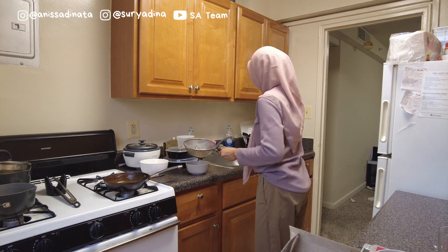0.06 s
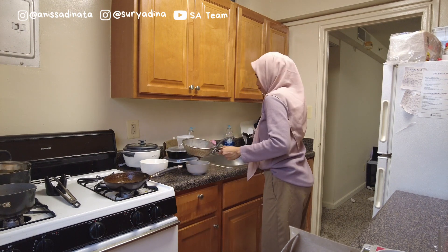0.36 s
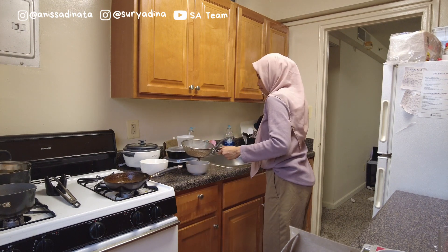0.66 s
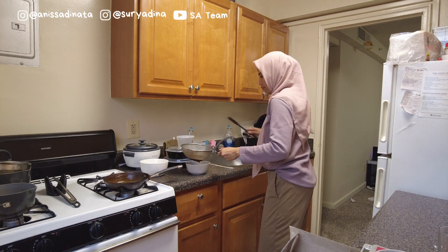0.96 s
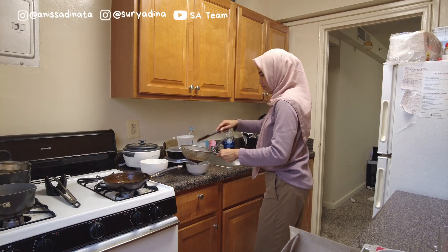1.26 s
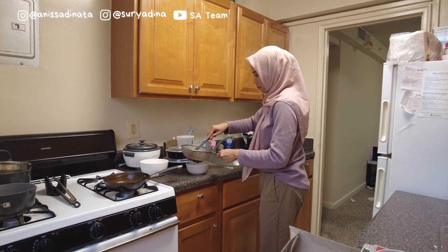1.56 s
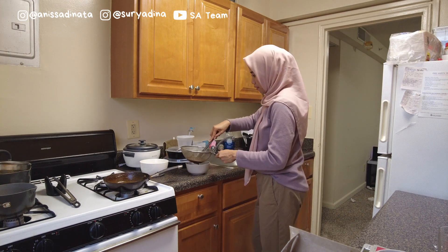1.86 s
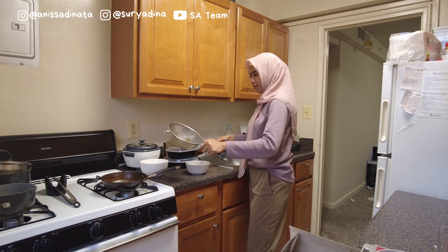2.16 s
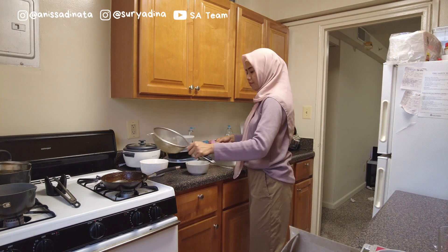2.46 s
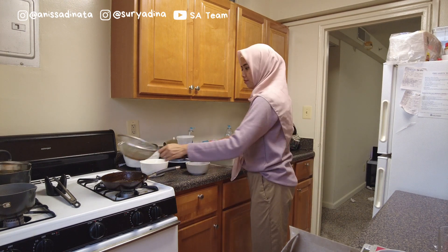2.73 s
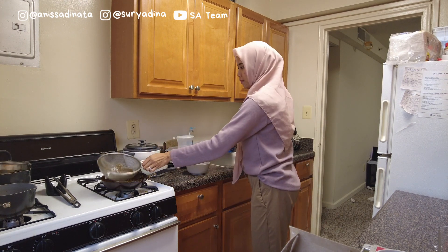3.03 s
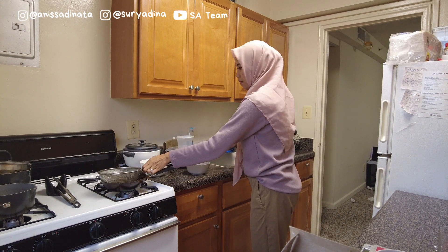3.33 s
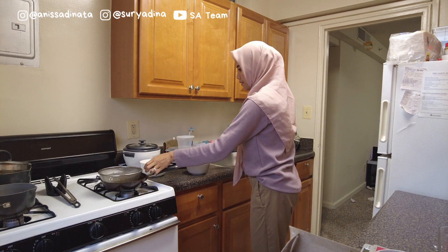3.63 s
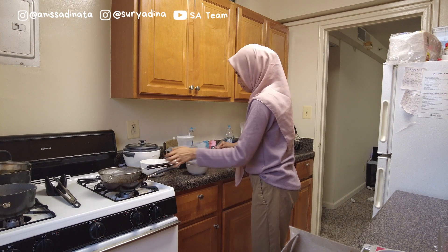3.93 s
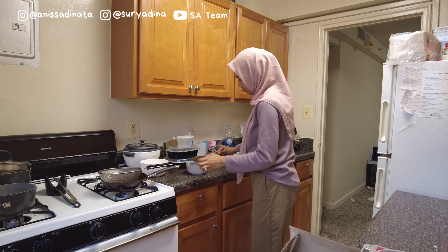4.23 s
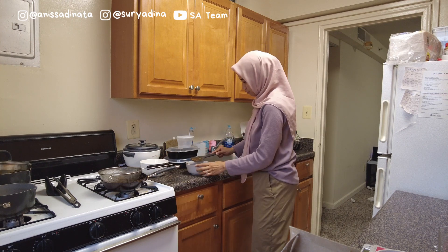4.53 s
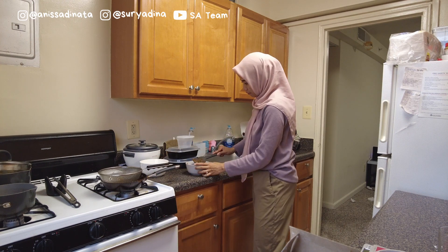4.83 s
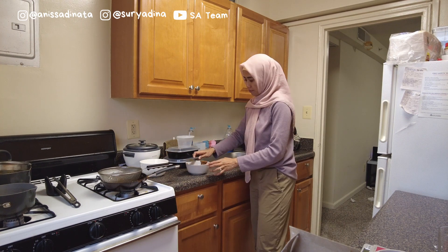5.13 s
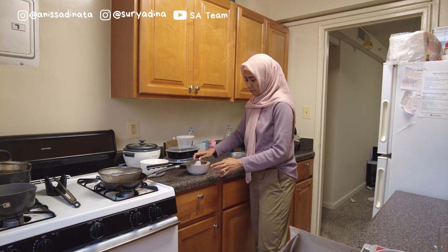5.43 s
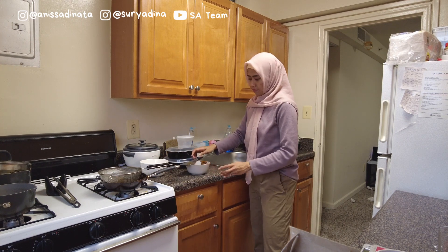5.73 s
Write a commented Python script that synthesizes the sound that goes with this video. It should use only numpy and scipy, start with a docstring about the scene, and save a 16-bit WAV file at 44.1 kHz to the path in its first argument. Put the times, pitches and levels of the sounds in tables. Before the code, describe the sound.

Steady ventilation and a low electrical hum fill a small kitchen throughout, with the action a few steps from the microphone. At about 0.5 seconds a heel knocks dully on the floor, followed by a brief shoe scuff. From 0.9 to 2.3 seconds a spatula wipes a wire sieve in faint, bright hisses, tapping its frame lightly at about 1.1 and 1.8 seconds. At 2.1 seconds the background changes abruptly as a running refrigerator adds a fuller drone. At 3.2 seconds the sieve clatters into a frying pan, with a short metallic clank, a low thud from the stove top and a brief skid as it settles. From 4.2 to 5 seconds the spatula rubs quietly around a bowl, with a thin ringing edge. A soft, dull rush swells twice between 5 and 5.6 seconds, then eases. Tiny ticks are scattered throughout.

```python
"""Sieving syrup in a small kitchen

A heel knocks on the floor a few steps away and a spatula wipes syrup through a wire sieve. The sieve
clatters into a frying pan on the stove, then the spatula rubs round the bowl. Ventilation and mains
hum run throughout; after an abrupt cut at about 2 s, a refrigerator is heard running.
A soft, dull rush swells near the end."""
import sys
import numpy as np
from scipy import signal
from scipy.fft import rfft, irfft
from scipy.io import wavfile

SR = 44100
rng = np.random.default_rng(int(sys.argv[2]) if len(sys.argv) > 2 else 0)


def output_pcm(signal):
    """Save a mono or channel-first signal as 16-bit PCM at the path in sys.argv[1].

    Samples are clipped to [-1, 1] before scaling.
    """
    pcm = np.clip(np.atleast_2d(signal).T, -1, 1) * 32767
    wavfile.write(sys.argv[1], SR, np.round(pcm).astype(np.int16))


N = 254982
TIME = np.arange(N) / SR
FREQS = np.maximum(np.fft.rfftfreq(N, 1 / SR), 1)
MAINS_HZ = 60
SLIDE_ATTACK_S, SLIDE_RELEASE_S = 0.0069, 0.014


def from_db(db):
    """Decibels to gain."""
    return 10 ** (np.asarray(db) / 20)


def unit_rms(x):
    """Scale to unit power."""
    return x / np.sqrt(np.mean(x ** 2) + 1e-20)


def at_hz(points, hz):
    """Interpolate a table over log frequency."""
    f, value = np.transpose(points)
    return np.interp(np.log(hz), np.log(f), value)


def colour(x, spectrum):
    """Filter by rows of f/Hz, relative density/dB; unit power."""
    return unit_rms(irfft(rfft(x) * from_db(at_hz(spectrum, FREQS)), N))


def drift(rate_hz):
    """Slow random wander, unit power."""
    return unit_rms(irfft(rfft(rng.standard_normal(N)) / (1 + (FREQS / rate_hz) ** 2), N))


def diffuse_pair(mid, side, hz):
    """Stereo diffuse field: alike in the bass, largely unrelated in the treble."""
    # left-right coherence: f/Hz, correlation
    coherence = [(30, 1), (120, 0.95), (250, 0.72), (450, 0.77), (700, -0.24), (1400, 0.53), (2400, 0.35),
                 (4400, -0.00018), (15000, -0.32)]
    alike = at_hz(coherence, hz)
    return np.sqrt((1 + alike) / 2) * mid + np.sqrt((1 - alike) / 2) * side * [[1], [-1]]


def mono_noise(spectrum):
    """Coloured noise, unit power."""
    return colour(rng.standard_normal(N), spectrum)


def stereo_noise(spectrum):
    """Diffuse coloured noise, unit power."""
    mid, side = rfft(rng.standard_normal((2, N)))
    return colour(irfft(diffuse_pair(mid, side, FREQS), N), spectrum)


def tones(lines, waver_hz):
    """Tones wavering in amplitude and phase; rows of f/Hz, rms level/dB, waver/fraction."""
    out = 0
    for hz, db, waver in lines:
        wobble = 1 + waver * (drift(waver_hz) + 1j * drift(waver_hz))
        tone = wobble * np.exp(2j * np.pi * (hz * TIME + rng.random()))
        out = out + from_db(db) * unit_rms(diffuse_pair(tone.imag, tone.real, hz))
    return out


def clicks(times_s, level_db):
    """One impulse per contact."""
    out = np.zeros(N)
    out[np.round(np.asarray(times_s) * SR).astype(int)] = from_db(level_db)
    return out


def fade(hits, t60_s, rise_s):
    """Envelope: quick rise at each impulse, exponential decay."""
    rise_pole = np.exp(-1 / (rise_s * SR))
    dying = signal.lfilter([1], [1, -from_db(-60 / (t60_s * SR))], hits + 1e-18)
    return signal.lfilter([1 - rise_pole], [1, -rise_pole], dying)


def ring(drive, hz, t60_s):
    """One mode: a unit impulse starts a decaying unit sine."""
    radius, angle = from_db(-60 / (t60_s * SR)), 2 * np.pi * hz / SR
    return signal.lfilter([0, np.sin(angle)], [1, -2 * radius * np.cos(angle), radius ** 2], drive + 1e-18)


def pushes(rows, attack_s, release_s):
    """Envelope: each push rises, holds and decays; the strongest counts."""
    envelopes = []
    for start_s, length_s, db in rows:
        attack = np.clip((TIME - start_s) / attack_s, 0, 1)
        release = np.exp(-np.maximum(TIME - start_s - length_s, 0) / release_s)
        envelopes.append(from_db(db) * attack * release)
    return np.max(envelopes, axis=0)


def rubbing(pressure, spectrum, judder_db):
    """Stick-slip friction: coloured noise of uneven level."""
    return pressure * from_db(judder_db * drift(rate_hz=9.1)) * mono_noise(spectrum)


def struck(times_s, level_db, modes, grit, grit_db, grit_t60_s, detune, scatter_db):
    """Each contact grates briefly and rings the modes with scattered strength and pitch."""
    out = from_db(grit_db) * fade(clicks(times_s, level_db), grit_t60_s, rise_s=0.00063) * mono_noise(grit)
    t = TIME[:SR // 5]
    hz, mode_db, t60_s = np.transpose(modes)[:, :, None]
    for at_s, contact_db in zip(times_s, level_db):
        strength, pitch = rng.standard_normal((2, len(modes), 1))
        polarity = rng.choice([-1, 1], (len(modes), 1))
        dying = from_db(contact_db + mode_db + scatter_db * strength - 60 * t / t60_s)
        partials = polarity * dying * np.sin(2 * np.pi * hz * (1 + detune * pitch) * t)
        start = int(at_s * SR)
        out[start:start + len(t)] += partials.sum(axis=0)
    return out


def ventilation(air_db=-38):
    """Moving air and building rumble under wavering fan tones."""
    # air and rumble: f/Hz, relative density/dB
    air = [(10, -16.5), (19, 2), (32, -13), (55, -15), (90, -25), (125, -21.5), (175, -31.5), (260, -32),
           (370, -41.5), (660, -44), (830, -46), (1600, -50), (2400, -59.5), (2900, -59.5), (3600, -64.5),
           (5800, -67), (11000, -75.5), (15500, -75.5)]
    # fan tones: f/Hz, rms level/dB, waver/fraction
    fan_lines = [(330.5, -67.5, 0.52), (271.4, -71.5, 1.2), (616, -74, 0.58), (681, -75, 1.7)]
    return from_db(air_db) * stereo_noise(air) + tones(fan_lines, waver_hz=2.2)


def mains_hum(fridge_running, level_db=-45.5, load_db=1.55):
    """Hum at twice the mains rate, louder while the refrigerator runs."""
    return from_db(load_db * fridge_running) * tones([(2 * MAINS_HZ, level_db, 0.08)], waver_hz=1.7)


def knocks(swell_t60_cycles=2.7):
    """A blow clacks dully; floor or stove top swells into a boom within a cycle or so."""
    # heel on floor, then stove: t/s, boom level/dB, clack level/dB
    hits = [(0.409, -28.5, -39), (0.458, -54, -47.5), (0.507, -28.5, -49), (0.521, -20.5, -59),
            (3.203, -30.5, -60), (3.257, -29, -55)]
    # boom modes: f/Hz, level/dB, t60/s
    modes = [(60.6, 2, 0.27), (74.1, 2, 0.1), (106.4, -2, 0.15), (152, -6.5, 0.11), (187, -14.5, 0.064),
             (260, -18.5, 0.034)]
    # clack: f/Hz, relative density/dB
    clack = [(80, -5.5), (200, 9), (450, -6.5), (700, -9), (1000, -14.5), (1900, -24), (4000, -33),
             (8000, -43.5), (14000, -53)]
    times_s, boom_db, clack_db = np.transpose(hits)
    blows = clicks(times_s, boom_db)
    boom = sum(from_db(db) * (ring(blows, hz, t60_s) - ring(blows, hz, swell_t60_cycles / hz))
               for hz, db, t60_s in modes)
    return boom + fade(clicks(times_s, clack_db), t60_s=0.23, rise_s=0.0035) * stereo_noise(clack)


def ticks(width_ratio=2.2):
    """Tiny contacts about the kitchen, each a noise burst around its own pitch."""
    # ticks: t/s, level/dB, centre f/Hz
    contacts = [(.47, -68, 8500), (.9, -64, 4600), (1.921, -63, 7500), (2.68, -69, 10000),
                (3.517, -68, 9800), (3.89, -66, 7700), (5.645, -63, 9050), (5.679, -57.5, 8300)]
    out = 0
    for at_s, db, hz in contacts:
        burst = mono_noise([(hz / width_ratio, -28), (hz, 0), (hz * width_ratio, -28)])
        out = out + fade(clicks([at_s], db), t60_s=0.016, rise_s=0.00089) * burst
    return out


def shoe_scuff():
    """The shoe slides briefly after the step."""
    # slide: start t/s, length/s, level/dB
    slides = [(.625, 0.09, -59.5)]
    # shoe friction: f/Hz, relative density/dB
    friction = [(200, -8), (440, 7.5), (600, -4), (850, -13), (1150, -24), (1800, -21), (4500, -31),
                (9000, -40)]
    return rubbing(pushes(slides, SLIDE_ATTACK_S, SLIDE_RELEASE_S), friction, judder_db=7.0)


def mesh_hiss(plucks_per_s=1600):
    """The wire mesh hisses, bright and grainy, under the spatula and as the sieve lands."""
    # spatula strokes, and the mesh flexing on landing at 3.266 s:
    # peak t/s, level/dB, length between 1/e points/s
    swells = [(0.941, -72, .022), (1.03, -78, .07), (1.117, -69, 0.057), (1.28, -67.5, 0.043),
              (1.63, -73, 0.1), (1.76, -66, .023), (2.32, -75, .08), (3.005, -73, 0.16), (3.266, -61, .028),
              (4.203, -74, .04), (4.56, -73, .052), (5.352, -68, .028)]
    # wire mesh: f/Hz, relative density/dB
    mesh = [(1200, -9), (2300, -4), (2900, 4), (3500, -10.5), (4300, 5), (5200, -2.5), (6000, 4.5),
            (7000, -3.5), (8200, 0.5), (10500, -4), (13500, -0.5), (16000, -1)]
    pressure = sum(from_db(db) * np.exp(-2 * np.abs(TIME - peak_s) / length_s)
                   for peak_s, db, length_s in swells)
    plucks = (rng.random(N) < plucks_per_s / SR) * rng.standard_normal(N)
    return pressure * colour(plucks, mesh)


def frame_taps(fall_db_per_octave=9):
    """A tap clicks and rings the sieve's frame; the spot touched favours modes near one pitch."""
    # taps, the last as the sieve settles: t/s, click level/dB, ring level/dB, favoured f/Hz
    taps = [(1.107, -57, -65.5, 3000), (1.12, -64, -69, 3200), (1.765, -57, -67, 2900),
            (1.772, -60, -69, 2800), (3.361, -60, -59.5, 4400)]
    # frame modes: f/Hz, level/dB, t60/s
    modes = [(2830, 4, 0.04), (3120, 5, 0.022), (4300, 1, .07), (4400, -12, .025), (6100, -1, .025)]
    times_s, click_db, ring_db, favoured_hz = np.transpose(taps)
    click_noise = mono_noise([(1000, 6), (3500, 1), (12000, -15)])
    out = fade(clicks(times_s, click_db), t60_s=0.019, rise_s=0.00044) * click_noise
    for hz, db, t60_s in modes:
        loss_db = fall_db_per_octave * np.abs(np.log2(hz / favoured_hz))
        out = out + ring(clicks(times_s, ring_db + db - loss_db), hz, t60_s)
    return out


def refrigerator(flow_db=-47.5, octave_db=-49):
    """Compressor drone, motor whine, fan and gas flow, plus the octave above the mains hum."""
    # compressor orders and motor whine: f/Hz, rms level/dB, waver/fraction
    motor_lines = [(58.8, -44.5, 0.09), (124.4, -51.5, 0.27), (270, -65.5, 1), (413, -76.5, 0.54),
                   (450.3, -75, 0.9), (603, -77.5, 1), (748, -83, 0.8), (886, -74, 0.44),
                   (1078, -84.5, 0.88), (1198, -77.5, 0.19), (1449, -78, 0.34), (1520, -81, .3),
                   (1555, -78, 0.25), (1660, -83.5, 0.25), (1799, -80.5, 0.46), (2006, -88, 0.6),
                   (2430, -85.5, 0.35), (2880, -89, .6), (2998, -85, 0.5)]
    # fan and gas flow: f/Hz, relative density/dB
    flow = [(30, -8.5), (70, -5.5), (105, -8.5), (150, -14.5), (220, -8.5), (360, -27), (450, -19),
            (550, -30), (660, -21), (800, -33), (1100, -39), (1450, -34.5), (1680, -42), (2300, -47.5),
            (2950, -43), (3600, -46), (6300, -51.5), (12000, -64)]
    octave = tones([(4 * MAINS_HZ, octave_db, 0.02)], waver_hz=1.5)
    return from_db(flow_db) * stereo_noise(flow) + tones(motor_lines, waver_hz=1.2) + octave


def sieve_rim():
    """The stiff wire rim lands, skips and chatters to rest, ringing at near-steady pitches."""
    # rim contacts: t/s, level/dB
    touches = [(3.1826, -51), (3.188, -52.5), (3.21, -59), (3.254, -64), (3.264, -65), (3.284, -71),
               (3.301, -66), (3.323, -65), (3.331, -67), (3.349, -63)]
    # rim modes: f/Hz, level/dB, t60/s
    modes = [(3150, 0.5, 0.023), (6170, -4, 0.04), (7360, -2, 0.022), (7630, 0, 0.047), (7700, -7, .03),
             (8760, -9, 0.022), (8740, -8, .025), (9330, -7.5, 0.032), (10800, -16, 0.04)]
    grit = [(1500, 3.5), (4500, 0), (7500, -4), (11000, -2.5), (15000, -5)]
    times_s, db = np.transpose(touches)
    return struck(times_s, db, modes, grit, grit_db=0, grit_t60_s=0.034, detune=0.0027, scatter_db=2.5)


def pan_clank(rebound_s=0.008, rebound_loss_db=6):
    """The sieve rocks onto the loosely loaded pan; each blow clanks differently and rebounds once."""
    # blows on the pan: t/s, level/dB
    blows = [(3.185, -54), (3.201, -43), (3.216, -48), (3.223, -52.5), (3.264, -59.5), (3.284, -56)]
    # pan modes: f/Hz, level/dB, t60/s
    modes = [(710, -12, 0.063), (913, -10, .04), (1040, -13, 0.045), (1200, -21, 0.018), (1330, -6, .02),
             (1420, -3, 0.026), (1566, 1, 0.037), (1710, -17, .022), (2020, -12.5, 0.052),
             (2670, -8, 0.023), (3000, -3, 0.024), (3910, -12, 0.025), (4210, -10, 0.024),
             (4310, -5, 0.036), (4440, -15.5, 0.022), (5830, -9, .025)]
    grit = [(200, 12.5), (900, -3), (1500, 8.5), (2500, -10.5), (4500, -6.5), (9000, -37)]
    rebounds = [(at_s + rebound_s, db - rebound_loss_db) for at_s, db in blows]
    times_s, db = np.transpose([*blows, *rebounds])
    return struck(times_s, db, modes, grit, grit_db=1.5, grit_t60_s=0.038, detune=0.025, scatter_db=4)


def sieve_skid():
    """The sieve slides briefly in the pan."""
    # slide: start t/s, length/s, level/dB
    slides = [(3.35, 0.069, -59)]
    # sieve-on-pan friction: f/Hz, relative density/dB
    friction = [(300, -6), (700, -6), (1100, 8), (1500, -1), (2100, -7), (3200, -18), (4500, -17),
                (9000, -45)]
    return rubbing(pushes(slides, SLIDE_ATTACK_S, SLIDE_RELEASE_S), friction, judder_db=1.5)


def bowl_rub(bandwidth_hz=22, grit_db=-6):
    """Each rub of the spatula wakes one narrow bowl resonance inside a soft scrape."""
    # rubs: peak t/s, Gaussian sigma/s, level/dB, resonance f/Hz
    rubs = [(4.202, 0.06, -78, 2990), (4.31, 0.055, -75.5, 2880), (4.52, 0.076, -79.5, 2900),
            (4.66, 0.06, -79, 3010), (4.75, 0.04, -80, 3000), (4.86, 0.059, -81, 2880),
            (4.918, 0.03, -73.5, 2640)]
    # scrape: f/Hz, relative density/dB
    grit = [(1800, -21), (2500, -1), (3000, -1), (3600, -11), (4400, -7), (7000, -28)]
    t60_s = np.log(1000) / (np.pi * bandwidth_hz)
    pressure = singing = 0
    for peak_s, sigma_s, db, hz in rubs:
        swell = from_db(db) * np.exp(-((TIME - peak_s) / sigma_s) ** 2 / 2)
        singing = singing + swell * unit_rms(ring(rng.standard_normal(N), hz, t60_s))
        pressure = pressure + swell
    return singing + from_db(grit_db) * rubbing(pressure, grit, judder_db=3.0)


def dull_rush():
    """Soft, dull noise swells twice near the end."""
    # swells: start t/s, length/s, level/dB
    swells = [(5.06, 0.38, -56), (5.44, 0.14, -53)]
    # rush: f/Hz, relative density/dB
    spectrum = [(120, -36), (300, 3), (620, -1.5), (900, -14.5), (1600, -11.5), (2000, -14.5), (2500, -33),
                (6000, -54)]
    return pushes(swells, attack_s=0.12, release_s=0.47) * stereo_noise(spectrum)


def kitchen(x, direct_db=-4.5, build_s=0.002):
    """Direct sound plus a dense tail that dies sooner in the treble."""
    # room decay: f/Hz, t60/s
    decay = [(100, 0.92), (1000, 0.49), (4000, 0.17), (15000, 0.23)]
    t = TIME[:SR // 2]
    edges_hz = np.geomspace(60, 18000, 9)
    tail = 0
    for low, high in zip(edges_hz, edges_hz[1:]):
        bandpass = signal.butter(2, [low, high], "band", fs=SR, output="sos")
        band = signal.sosfilt(bandpass, rng.standard_normal((2, len(t))))
        tail = tail + band * from_db(-60 * t / at_hz(decay, np.sqrt(low * high)))
    response = unit_rms(tail * (1 - np.exp(-t / build_s))) / np.sqrt(len(t))
    response[:, 0] += from_db(direct_db)
    return signal.fftconvolve(x[None], response, axes=1)[:, :N]


def scene(cut_s=2.128):
    """Utensils, ticks and scuff sound through the room; machines, rush and knocks lean slightly left."""
    # balance: f/Hz, left minus right/dB
    balance = [(30, 3), (60, 2), (125, -1), (250, 1.3), (500, 1.5), (1000, 1), (8000, 0.3)]
    contacts = mesh_hiss() + sieve_rim() + pan_clank() + frame_taps() + ticks()
    slides = bowl_rub() + sieve_skid() + shoe_scuff()
    after_cut = np.clip((TIME - cut_s) / 0.0024, 0, 1)
    machines = ventilation() + mains_hum(after_cut) + after_cut * refrigerator()
    surroundings = machines + dull_rush() + knocks()
    lean = from_db(at_hz(balance, FREQS) / 2 * [[1], [-1]])
    return kitchen(contacts + slides) + irfft(rfft(surroundings) * lean, N)


def record(dry):
    """Short fades at both ends and a steep low-pass."""
    fade_s, cutoff_hz = 0.004, 15750
    ramp = np.minimum(np.minimum(TIME, TIME[::-1]) / fade_s, 1)
    lowpass = signal.ellip(12, 0.1, 90, cutoff_hz, fs=SR, output="sos")
    return signal.sosfilt(lowpass, dry * np.sin(np.pi / 2 * ramp) ** 2)


dry = scene()
out = record(dry)
output_pcm(out)
```